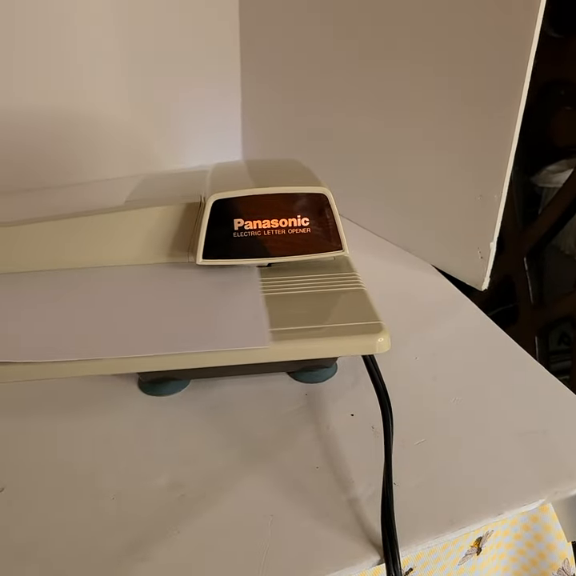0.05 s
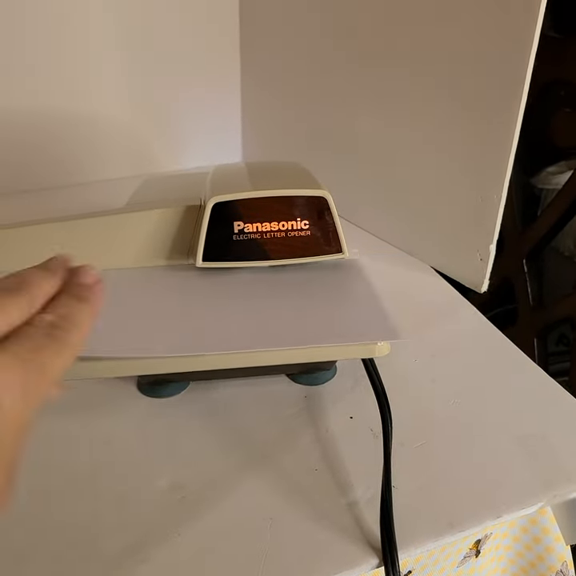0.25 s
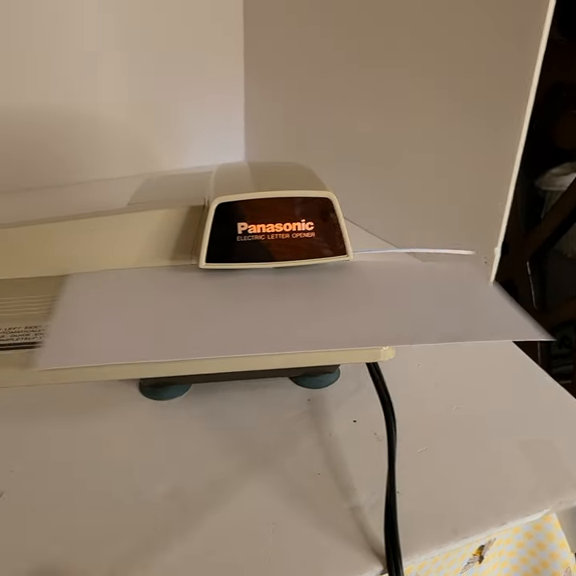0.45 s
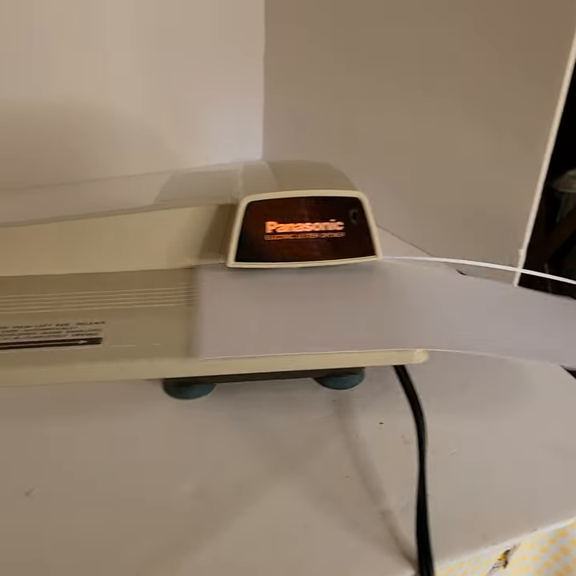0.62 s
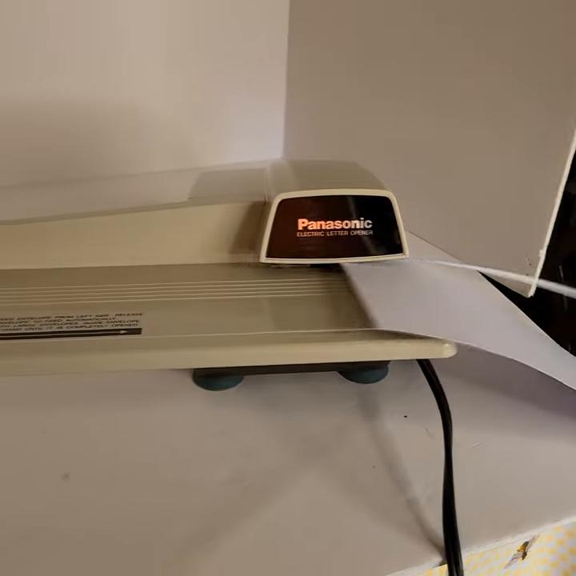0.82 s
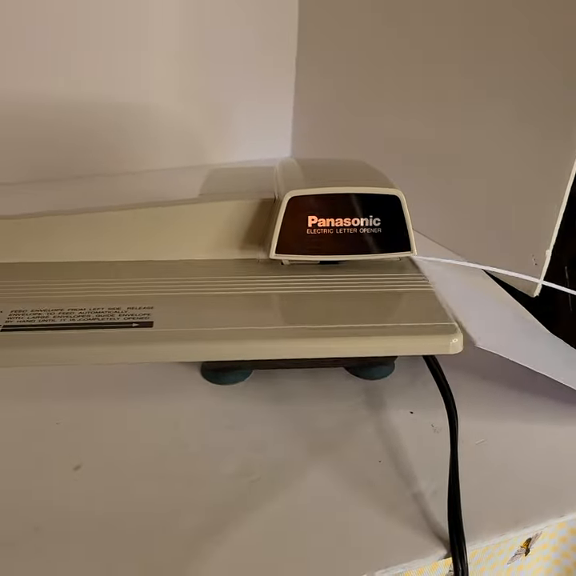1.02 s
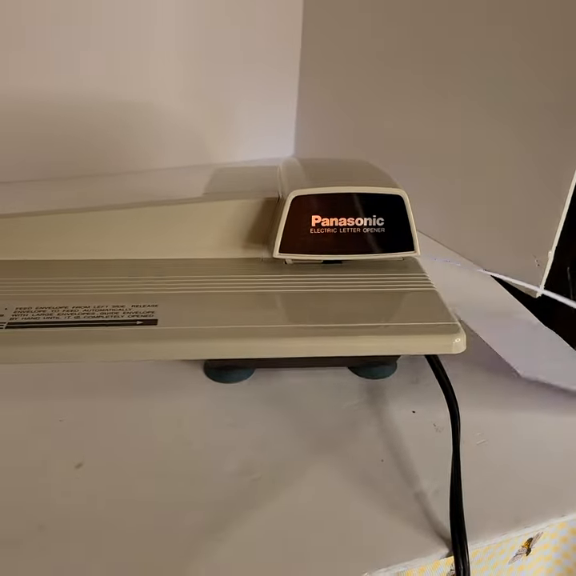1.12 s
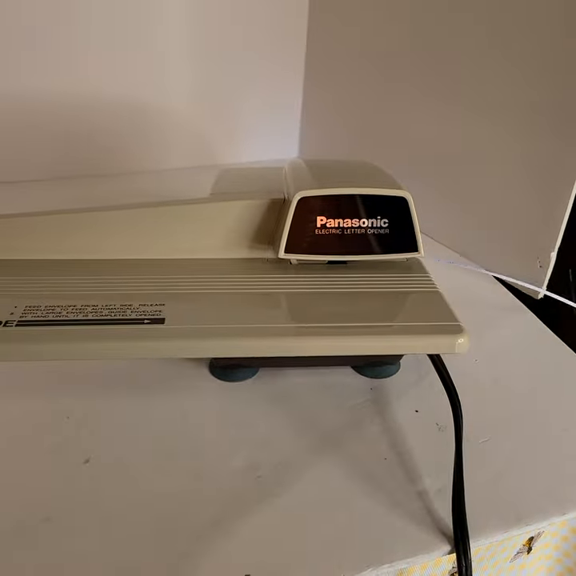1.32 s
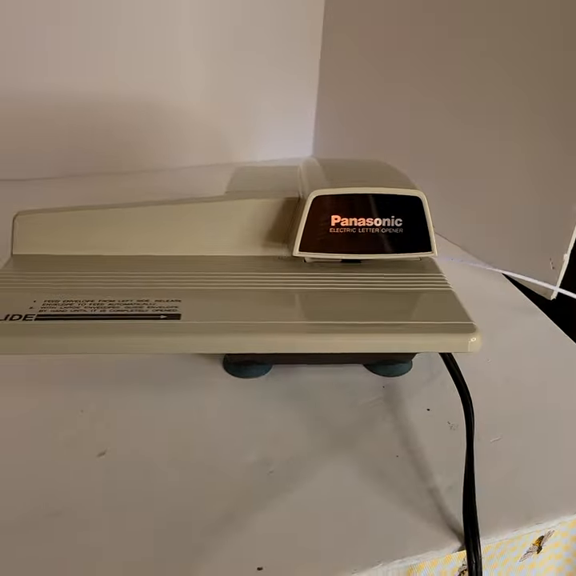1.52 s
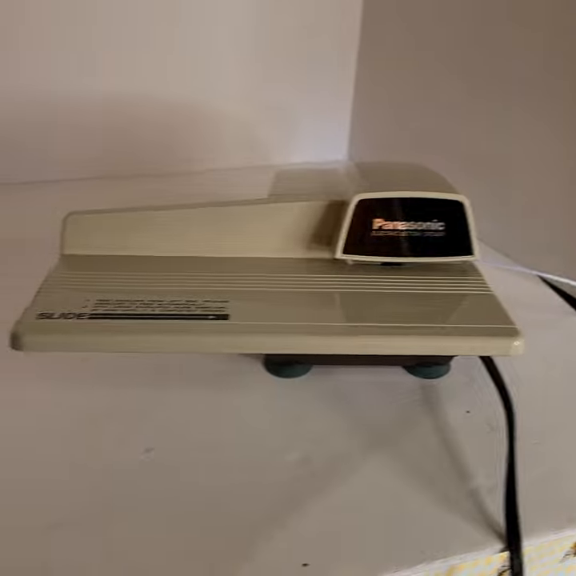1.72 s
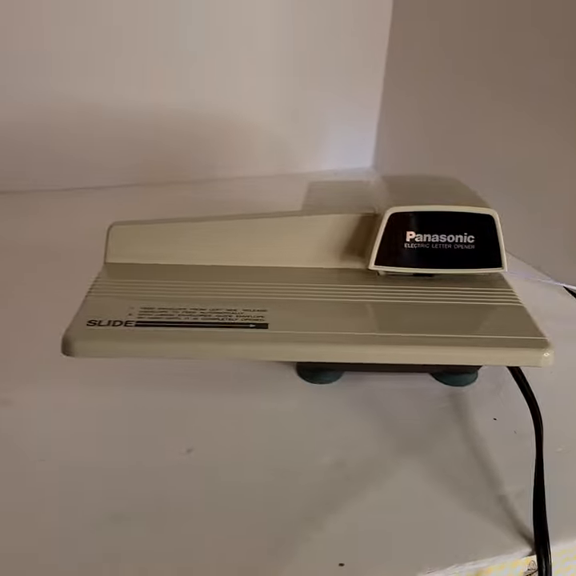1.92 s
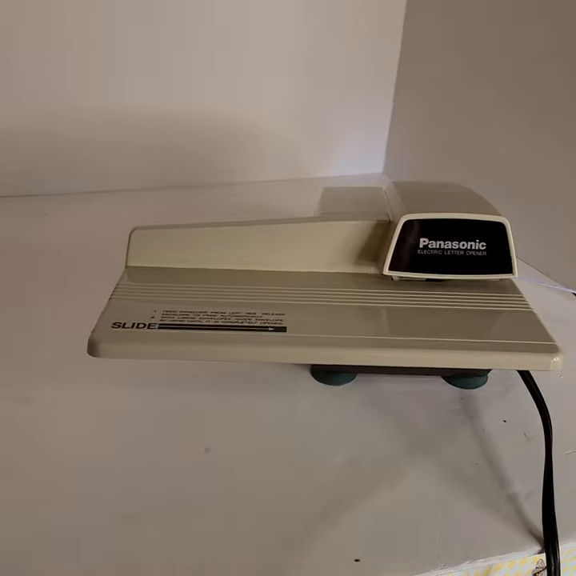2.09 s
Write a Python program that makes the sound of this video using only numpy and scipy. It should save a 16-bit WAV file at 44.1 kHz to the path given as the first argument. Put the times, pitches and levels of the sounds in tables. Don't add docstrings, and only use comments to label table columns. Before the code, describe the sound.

Brief buzzing gear whine and paper hiss from a desktop letter opener, coasting down with loose rattling.

```python
import sys
import numpy as np
from scipy import signal
from scipy.fft import rfft, irfft, next_fast_len
from scipy.io import wavfile

SR = 44100
rng = np.random.default_rng(int(sys.argv[2]) if len(sys.argv) > 2 else 0)


def dump_mix(stems):
    frames = np.atleast_2d(stems).T
    limited = np.clip(frames, -1, 1)
    pcm = np.round(limited * 32767).astype(np.int16)
    wavfile.write(sys.argv[1], SR, pcm)


def how_loud(loudness_db):
    steps = np.asarray(loudness_db, float) / 20
    return 10 ** steps


N = 94815
T = np.arange(N) / SR

POWER_ON_S, POWER_RISE_S, POWER_OFF_S = 0.251, 0.012, 0.9146
LOCKED_HZ = 631.5

# start_s, knock_db, chatter_db, left_shift_db
TRAIN = [(.1, -77, -65.5, 3), (.18, -45, -41, -10), (.208, -32, -42, -11), (.236, -29.5, -31, -3),
         (.256, -31.5, -34, 2), (.6, -53, -35, 1.5), (.925, -61, -29, -1.5), (.958, -31, -34.5, -5),
         (1.05, -30, -37, -3), (1.13, -30.5, -40.5, -3), (1.215, -34, -43, -6), (1.33, -35.5, -42.5, -1.5),
         (1.42, -43, -57, -10.5), (1.51, -51.5, -49, -5.5), (1.55, -81, -77.5, 8)]


def rms_one(x):
    return x / np.sqrt(np.mean(x ** 2) + 1e-20)


def in_time(rows):
    s, *columns = np.transpose(rows)
    return [np.interp(T, s, c) for c in columns]


def at_hz(points, hz):
    table_hz, value = np.transpose(points)
    return np.interp(np.log(hz), np.log(table_hz), value)


def pan(db):
    return how_loud(np.multiply.outer([.5, -.5], db)).reshape(2, -1)


def drift(rate_hz):
    r = np.exp(-80 * np.pi * rate_hz / SR)
    slow = signal.lfilter([1], [1, -2 * r, r * r], rng.standard_normal(N // 40 + 2002))[2000:]
    return np.interp(np.arange(N) / 40, np.arange(len(slow)), rms_one(slow))


def resonate(x, hz, width_hz):
    r = np.exp(-np.pi * width_hz / SR)
    poles = [1, -2 * r * np.cos(2 * np.pi * hz / SR), r * r]
    return signal.lfilter([(1 - r * r) / 2, 0, (r * r - 1) / 2], poles, x)


def banded_noise(spectrum, patchy_db, likeness):
    low_hz = spectrum[0][0]
    edges = np.geomspace(low_hz, 17000, int(3 * np.log2(17000 / low_hz)) + 2)
    white = rng.standard_normal((2, 2, N + SR // 2))
    out = 0
    for k, (low, high) in enumerate(zip(edges, edges[1:])):
        band = signal.butter(2, [low, high], "band", fs=SR, output="sos")
        mid, side = signal.sosfilt(band, white[k % 2])[:, -N:]
        hz = np.sqrt(low * high)
        alike = np.clip(at_hz(likeness, hz), -1, 1)
        stereo = np.sqrt(1 + alike) * mid + np.sqrt(1 - alike) * side * [[1], [-1]]
        out = out + how_loud(at_hz(spectrum, hz) + patchy_db * drift(15)) * stereo
    return rms_one(out)


def tooth_rate():
    # start_s, tooth_rate_hz
    speed = [(.1, 20), (.17, 104), (.208, 322), (.235, 480), (.254, 625), (.27, 629), (.38, 631.5),
             (.945, 631.5), (.962, 620), (.996, 562), (1.052, 492), (1.09, 452), (1.196, 335), (1.246, 285),
             (1.3, 233), (1.362, 181), (1.424, 138), (1.56, 45)]
    return in_time(speed)[0]


def turning():
    teeth_per_shaft, teeth_per_cutter, cutter_peak_s = 10.65, 81, .395
    mesh = 2 * np.pi * np.cumsum(tooth_rate()) / SR
    cutter = mesh / teeth_per_cutter
    return mesh, mesh / teeth_per_shaft, cutter - np.interp(cutter_peak_s, T, cutter)


def room_tone():
    # hz, db_per_hz
    floor_colour = [(22, -3.5), (36, -9), (150, -13), (400, -19), (1500, -27.5), (4000, -36), (8000, -49),
                    (16000, -49)]
    # hz, left_right_likeness
    floor_likeness = [(60, 0.88), (240, 0.92), (950, -0.026), (3770, -0.37), (15000, -0.91)]
    # hz, width_hz, level_db
    hums = [(55.2, 23, -59.5), (81.3, 8.8, -54.5), (119.7, 6.2, -57), (149.5, 11, -54)]
    out = how_loud(-49.5) * banded_noise(floor_colour, 0.69, floor_likeness)
    for hz, width_hz, db in hums:
        hum = resonate(resonate(rng.standard_normal(N), hz, width_hz), hz, width_hz)
        out = out + how_loud(db) * rms_one(hum)
    return out


def room(x):
    t60_s, wall_cut_hz = .22, 7000
    size = next_fast_len(N + SR)
    hz = np.arange(size // 2 + 1) * SR / size
    out, source = np.zeros((2, N)), rfft(x, size)
    for k, lag_s in enumerate(rng.uniform(.008, .035, 16)):
        loss = how_loud(-60 * lag_s / t60_s) / (1 + 1j * hz / wall_cut_hz)
        echo = loss * np.exp(-2j * np.pi * hz * lag_s)
        out[k % 2] += irfft(source * echo / (1 - echo), size)[:N] * (-1) ** (k // 2)
    return out


def pitched_ticks():
    # start_s, peak_db, pitch_hz, t60_s, left_minus_right_db
    tick_table = [(0.0957, -44.5, 910, 0.034, 5), (0.137, -35.5, 5550, 0.023, 16.5),
                  (0.139, -46, 10900, 0.019, 9), (.138, -48, 13600, 0.015, 9), (0.146, -33, 950, 0.03, 3),
                  (0.15, -31, 980, 0.028, -4), (0.15, -43.5, 2250, 0.03, 13), (0.152, -48, 5340, 0.038, 11),
                  (0.22, -41.5, 4980, 0.018, 14), (.229, -18, 1399, 0.026, 1),
                  (0.233, -29.5, 960, 0.032, 4), (0.1376, -46, 2700, 0.031, 6), (1.51, -48, 3250, 0.035, 2),
                  (1.96, -55.5, 1483, .03, 0), (0.234, -24, 2676, 0.055, -2),
                  (0.9585, -26.5, 7700, 0.011, 7), (0.959, -27.5, 11900, 0.022, 8),
                  (1.376, -37.5, 326, 0.094, -6), (1.5095, -41.5, 2470, 0.025, -5),
                  (1.51, -47, 4720, 0.022, 7), (1.508, -49.5, 7740, 0.028, 9),
                  (1.52, -45.5, 2460, 0.089, 0), (1.517, -56, 7300, 0.05, 7),
                  (1.524, -56.5, 4700, 0.093, 7), (1.96, -40.5, 302, 0.021, -2),
                  (1.961, -53.5, 1110, 0.04, -9.5), (1.96, -43, 680, 0.043, 1), (1.964, -56, 4700, .06, 7)]
    out = 0
    for s, db, hz, t60, pan_db in tick_table:
        age = np.maximum(T - s, 0)
        decay = how_loud(-60 * np.minimum(age / t60, 3))
        burst = rng.standard_normal(N) * (T > s) * np.minimum(age / .001, 1) * decay
        width_hz = .045 * hz + 150 * (hz < 1200)
        ring = resonate(resonate(burst, hz, width_hz) + .05 * burst, hz, 3 * width_hz)
        out = out + how_loud(db) * pan(pan_db) * ring / np.abs(ring).max()
    return out


def snaps():
    # start_s, level_db, t60_s, left_minus_right_db
    snap_table = [(.1375, -41, 0.024, 6), (.219, -31, .03, 5), (.9585, -19, 0.023, 8),
                  (1.103, -32, 0.022, 1), (1.383, -52, .02, 3), (1.508, -51, 0.029, 2),
                  (1.521, -59, .03, 3), (1.567, -52, .015, 3), (1.96, -59.5, 0.067, 8)]
    band = signal.butter(1, [1800, 11000], "band", fs=SR, output="sos")
    out = 0
    for s, db, t60, pan_db in snap_table:
        noise = rng.standard_normal((3, N))
        decay = how_loud(-60 * np.clip((T - s) / t60, 0, 3))
        burst = (noise[0] + .6 * noise[1:]) * np.clip((T - s) / .0015, 0, 1) * decay
        out = out + how_loud(db - 3) * pan(pan_db) * signal.sosfilt(band, burst)
    return out


def rustle():
    # start_s, level_db
    rustle_level = [(0, -69), (.1, -62.5), (.2, -58), (.22, -95), (1.66, -95), (1.69, -80), (1.76, -66),
                    (1.83, -79), (1.97, -66), (2.04, -85)]
    colour = [(2500, 3), (5000, 1.5), (10000, -6), (16000, -7)]   # hz, db_per_hz
    hiss = banded_noise(colour, 1.5, [(3000, 0.299), (15000, .2)])
    return hiss * how_loud(in_time(rustle_level)[0])


def envelope_slide():
    # start_s, level_db
    slide_level = [(.93, -90.5), (.98, -57), (1.04, -37), (1.12, -44.5), (1.19, -54.5), (1.25, -47),
                   (1.345, -52), (1.375, -90)]
    # hz, db_per_hz
    slide_colour = [(3500, -11), (5000, 5.5), (6500, 3), (7700, 1), (9000, -21), (12000, -15), (16000, -11)]
    hiss = banded_noise(slide_colour, 0.88, [(3000, 0.19), (15000, 0.13)])
    return hiss * how_loud(in_time(slide_level)[0]) * pan(1.2)


def blade_rub():
    # start_s, level_db, left_minus_right_db
    rub_level = [(.19, -83, 7), (.212, -63.5, 14), (.222, -44.5, 5.5), (.27, -38.5, 2.5), (.5, -40.5, 3.5),
                 (.93, -38, 5.5), (.99, -34, 1.5), (1.01, -51.5, 19), (1.12, -51, 9), (1.36, -67, -4),
                 (1.4, -71, 5), (1.54, -64, 2), (1.6, -89, 2)]
    # hz, db_per_hz
    rub_colour = [(3000, -9), (3550, -10), (4600, 3.5), (6200, -0.5), (8800, -17), (10800, -5), (12300, -9),
                  (16000, -14)]
    throb_db, patchy_db = 1.0, .6
    db, pan_db = in_time(rub_level)
    hiss = banded_noise(rub_colour, patchy_db, [(3000, .5), (15000, 0.41)])
    hiss = hiss + 1.3 * resonate(hiss, 10700, 998) + 0.86 * resonate(hiss, 7920, 310)
    return hiss * how_loud(db + throb_db * np.cos(turning()[2]) + 1.2 * drift(70)) * pan(pan_db)


def paper():
    left, right = blade_rub() + envelope_slide() + rustle()
    return np.array([left, np.roll(right, 4)])


def coasting():
    # order, level_db, loudest_s, lasting_s
    coast_orders = [(2, -35, 1.087, 0.044), (5, -39, 1.04, .045), (6, -49, 1.08, 0.035),
                    (4, -42, 1.203, 0.045), (3, -42, 1.2, 0.034)]
    mesh = turning()[0]
    out = 0
    for order, db, s, length_s in coast_orders:
        swell = np.exp(-((T - s) / length_s) ** 2)
        out = out + np.sqrt(2) * how_loud(db + 1.6 * drift(30)) * swell * np.sin(round(order) * mesh)
    return out


def gear_knocks():
    # hz, width_hz, gain_db, left_minus_right_db, knock_extra_db
    housing = [(794, 260, -10.5, 8.5, -8.5), (963, 95, -0.5, -2, 3.5), (1238.5, 93, -0.5, 5, 0),
               (1446, 114, 1, -1, 0), (1715, 40, 1.5, 4, 3), (1913, 53.4, 5.5, 10, 3.5),
               (2332, 80, -7, 14.5, 5.5), (2614, 99, -3.5, 14, -3), (3150, 360, -15, 14.5, -15),
               (3850, 170, -22, 26, -13.5), (5570, 200, -24, 22, -7), (6500, 370, -29, 20, -6)]
    tooth_scatter_s, knock_cut_hz, hard_above_hz = .000025, 1270, 374
    mesh, shaft, cutter = turning()
    rate = tooth_rate()
    knock_db, chatter_db, _ = in_time(TRAIN)
    count = np.floor(mesh / (2 * np.pi) + rate * tooth_scatter_s * drift(140))
    tooth = np.diff(np.maximum.accumulate(count), prepend=0).clip(0) * np.sqrt(SR / rate)
    uneven = 1 + 0.057 * rng.standard_normal(N) + 0.069 * np.cos(shaft)
    knocks = tooth * uneven * how_loud(knock_db + 2.9 * drift(14))
    knocks = signal.sosfilt(signal.butter(2, knock_cut_hz, fs=SR, output="sos"), knocks)
    hard = np.clip(rate / hard_above_hz, 0, 1)
    knocks = hard * knocks + (1 - hard) * resonate(knocks, 790, 290)
    chatter = rng.standard_normal((2, N)) * how_loud(chatter_db + 1.1 * np.cos(cutter) + 1.4 * drift(64))
    soft_chatter = 0.11 * chatter + 1.44 * resonate(chatter, 680, 350)
    chatter = hard * chatter + (1 - hard) * soft_chatter
    out = 0
    for k, (hz, width_hz, db, pan_db, knock_extra_db) in enumerate(housing):
        alike = np.clip(1200 / hz, 0, 1) ** 2
        spread = np.sqrt(1 - alike ** 2) * chatter[1] * [[1], [-1]]
        drive = how_loud(knock_extra_db) * knocks + alike * chatter[0] + spread
        out = out + (-1) ** k * how_loud(db + 19) * pan(pan_db) * resonate(drive, hz, width_hz)
    return signal.sosfilt(signal.butter(3, 640, "high", fs=SR, output="sos"), out)


def power_rise():
    return np.clip((T - POWER_ON_S) / POWER_RISE_S, 0, 1)


def power():
    return power_rise() * np.exp(-np.maximum(T - POWER_OFF_S, 0) / 0.037)


def side_tones():
    # hz, level_db, sway_hz (per cutter turn)
    tone_table = [(909, -45, 1), (1497, -37, 26), (2014.5, -43, 1), (5171, -57, 1)]
    cutter, gate = turning()[2], power()
    out = 0
    for hz, db, sway_hz in tone_table:
        pitch_hz = (hz + sway_hz * np.cos(cutter + 0.22)) * tooth_rate() / LOCKED_HZ
        phase = 2 * np.pi * np.cumsum(pitch_hz) / SR + .3 * drift(25.28)
        out = out + np.sqrt(2) * how_loud(db + 2.5 * drift(27)) * pan(1.3) * np.sin(phase) * gate
    return out


def whine():
    # start_s, load (0-1), second_order_shade_db, third_order_lift_db
    cutting = [(.26, 0.4, -7, 2.5), (.3, 0.25, -10.5, 2), (.4, 0.26, -7.5, 1.5), (.6, 0.41, -10, -2),
               (.625, 0.76, -10, 0.5), (.7, .8, -14.5, 0.5), (.78, 1, -12.5, 0.5), (.83, 0.9, -39, 2),
               (.88, 0.93, -40, -1), (.92, 0.51, -7, 2)]
    # order, level_db, left_minus_right_db, load_gain_db, cutter_throb_db
    whine_orders = [(1, -28.5, 3.5, 0.9, -1.24), (2, -19, 0.5, 3, 1), (3, -26.5, 9.5, 7.5, 1),
                    (4, -34, 2, -9, 6), (5, -45, -10, -4, 1.5), (7, -44.5, 9.5, -7, 3.5),
                    (8, -44, -2, -11, 6.5), (9, -55.5, 17, -6.5, 7)]
    left_lead = [0.24, -1.15, 1.73, 3]
    shaft_depth, twice_shaft_depth, panel_fall_s = .1, .07, 0.046
    mesh, shaft, cutter = turning()
    load, shade_db, lift_db = in_time(cutting)
    gate = power()
    out = 0
    for k, (order, db, pan_db, load_db, throb_db) in enumerate(whine_orders):
        lead = left_lead[min(k, len(left_lead) - 1)] * (1 - 1.3 * load) * np.array([[.5], [-.5]])
        level = db + load_db * load + throb_db * np.cos(cutter)
        if k == 1:
            level = level + shade_db
        if k == 2:
            level = level + lift_db
        level = level + min(.2 * order, 1.2) * drift(42)
        if k == 0:
            held_hz = np.where(T < POWER_OFF_S, tooth_rate(), LOCKED_HZ)
            phase = 2 * np.pi * np.cumsum(held_hz) / SR
            swell = power_rise() * np.exp(-np.maximum((T - POWER_OFF_S) / panel_fall_s, 0) ** 2)
        else:
            start = rng.uniform(0, 2 * np.pi, 2)
            phase = round(order) * mesh + min(.06 * order, .45) * drift(15)
            sway = shaft_depth * np.cos(shaft + start[0])
            if k == 2:
                sway = sway + shaft_depth * twice_shaft_depth / shaft_depth * np.cos(2 * shaft + start[1])
            swell = (1 + sway) * gate
        out = out + np.sqrt(2) * how_loud(level) * pan(pan_db) * np.sin(phase + lead) * swell
    return out + side_tones()


def scene():
    left_shift_db = in_time(TRAIN)[2]
    gears = (whine() + gear_knocks() + coasting()) * how_loud(left_shift_db * [[.5], [-.5]])
    machine = gears + pitched_ticks() + snaps()
    return machine + how_loud(-20) * room(machine.mean(axis=0)) + paper() + room_tone()


def roll_off(x):
    return signal.sosfilt(signal.butter(12, 15750, fs=SR, output="sos"), x)


def record(dry):
    rounded = .75 * np.tanh(dry / .75)
    top_cut = signal.cheby2(12, 60, 17500, fs=SR, output="sos")
    return roll_off(signal.sosfilt(top_cut, rounded))


dry = scene()
out = record(dry)
dump_mix(out)
```